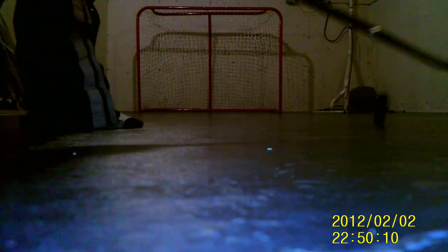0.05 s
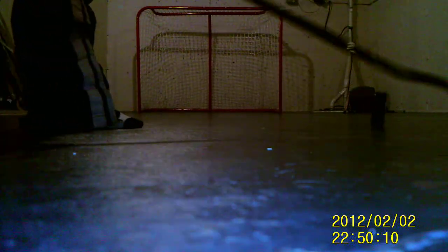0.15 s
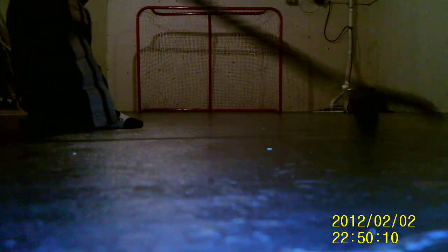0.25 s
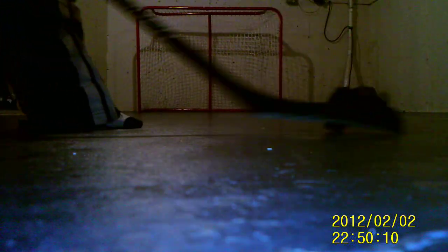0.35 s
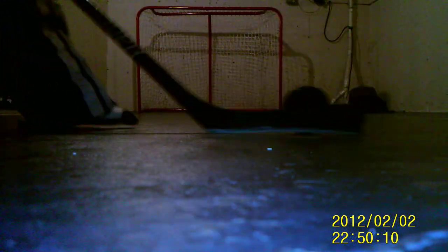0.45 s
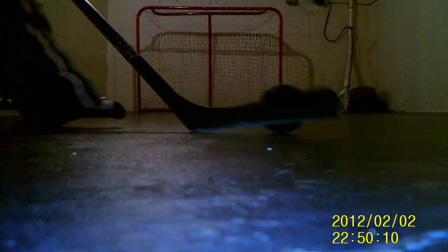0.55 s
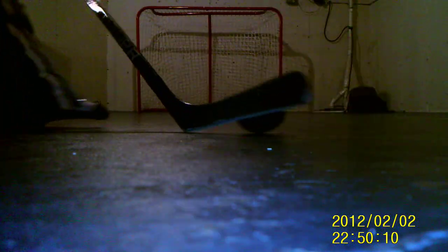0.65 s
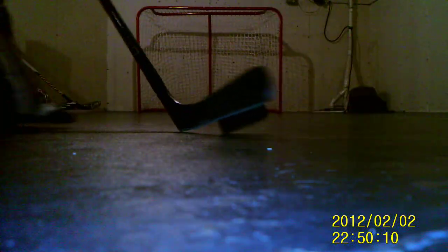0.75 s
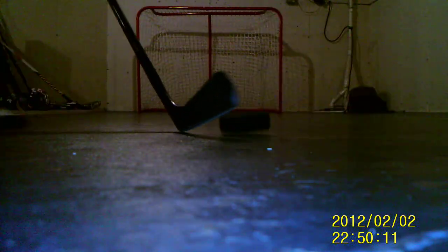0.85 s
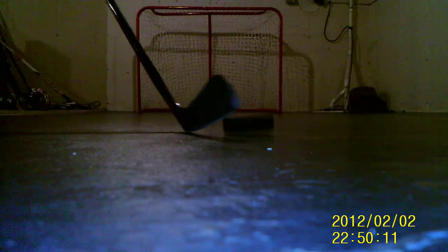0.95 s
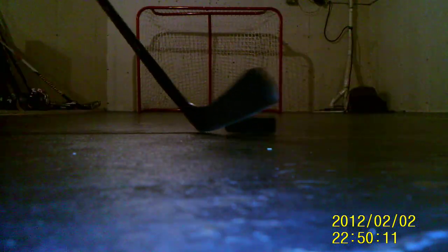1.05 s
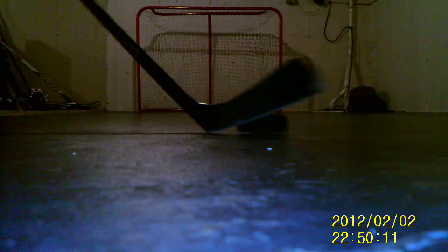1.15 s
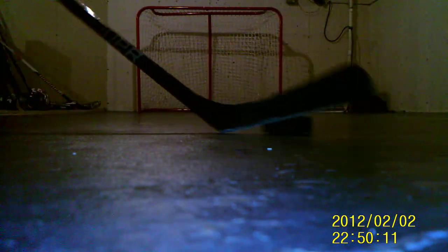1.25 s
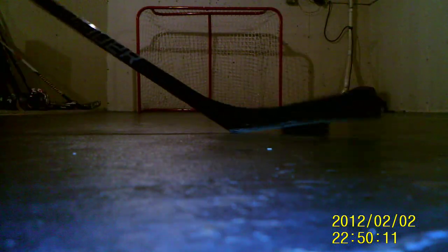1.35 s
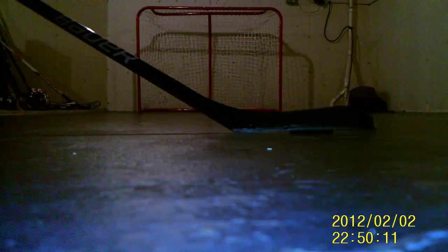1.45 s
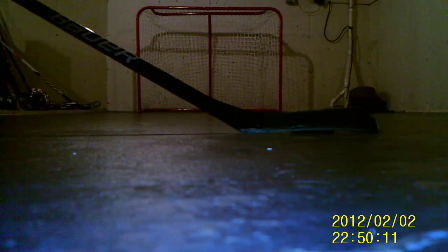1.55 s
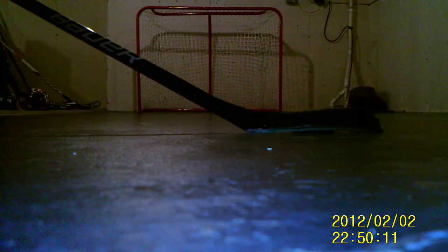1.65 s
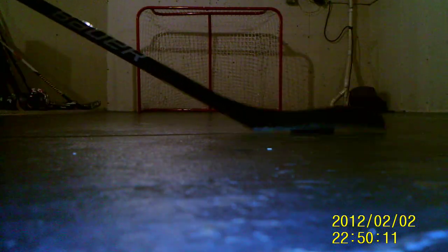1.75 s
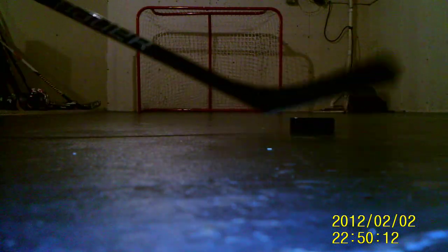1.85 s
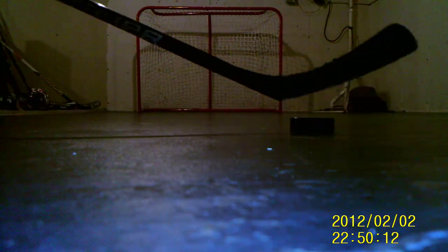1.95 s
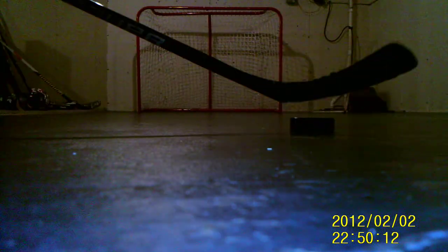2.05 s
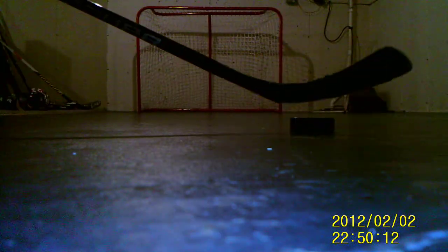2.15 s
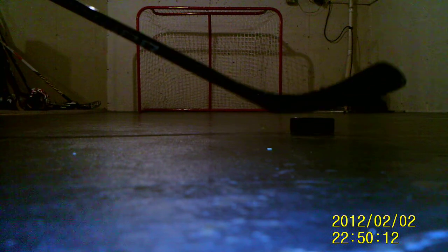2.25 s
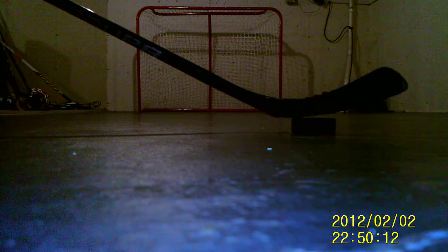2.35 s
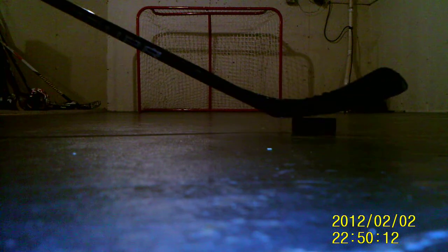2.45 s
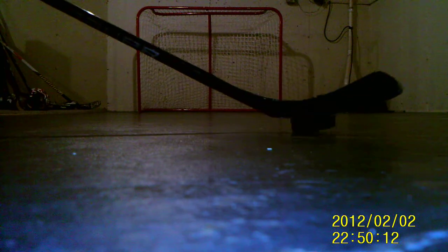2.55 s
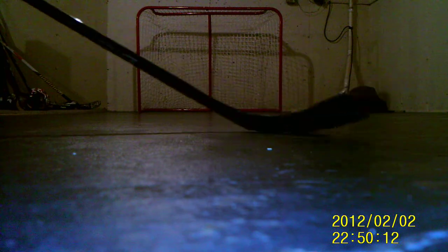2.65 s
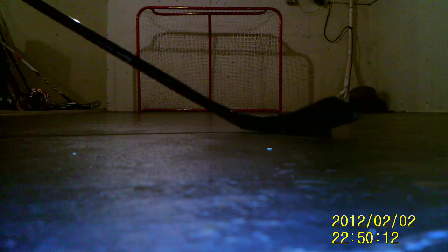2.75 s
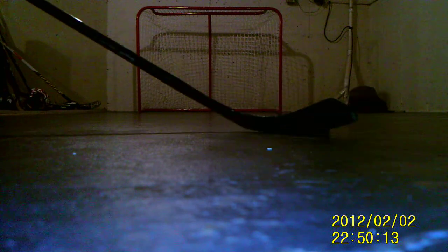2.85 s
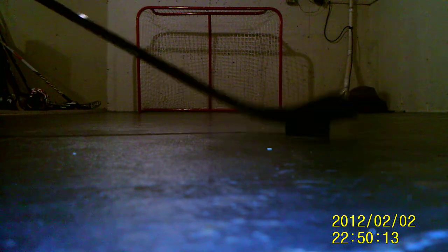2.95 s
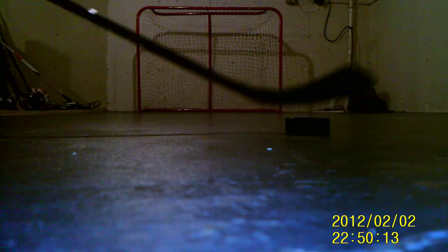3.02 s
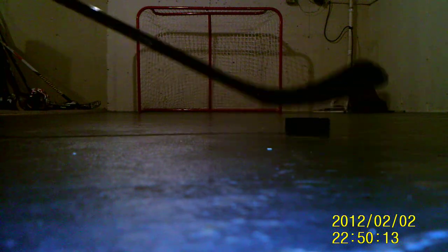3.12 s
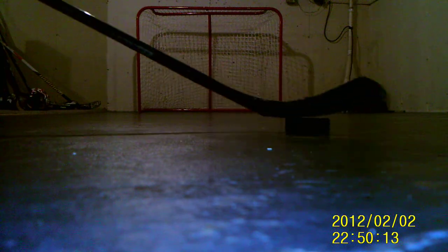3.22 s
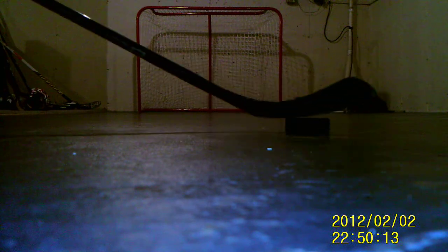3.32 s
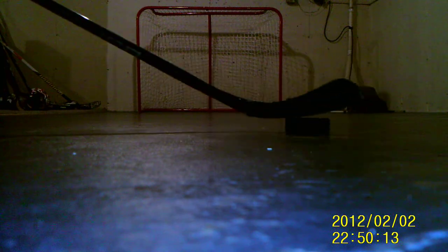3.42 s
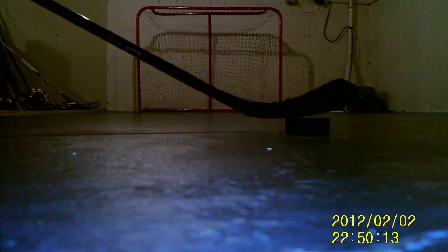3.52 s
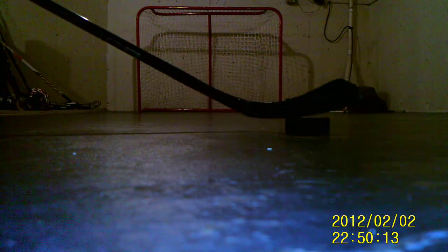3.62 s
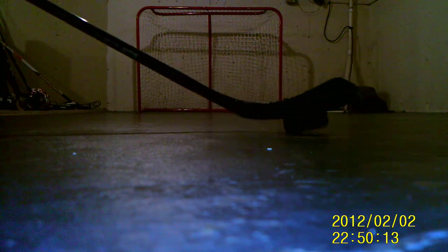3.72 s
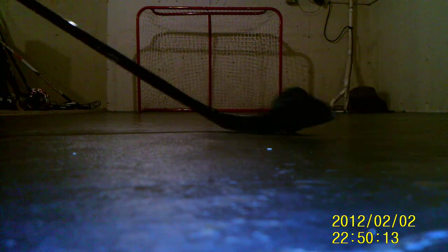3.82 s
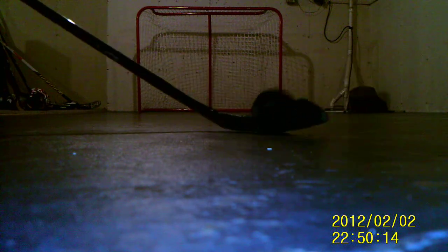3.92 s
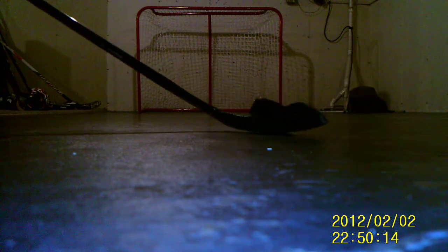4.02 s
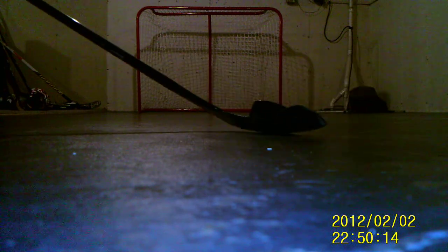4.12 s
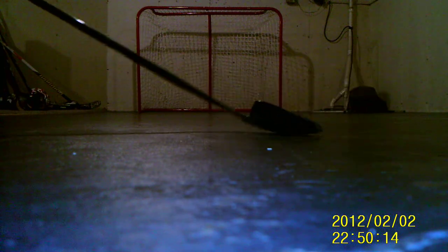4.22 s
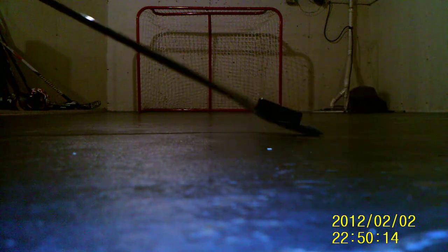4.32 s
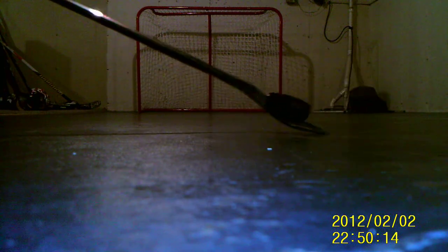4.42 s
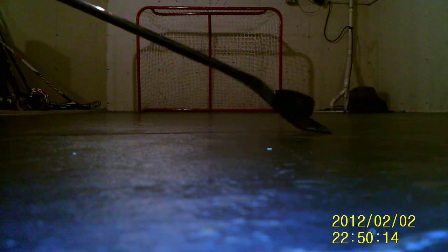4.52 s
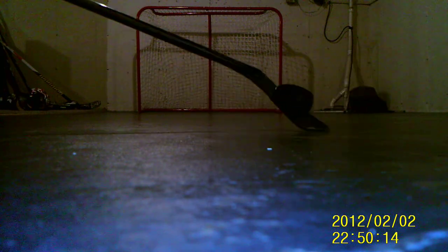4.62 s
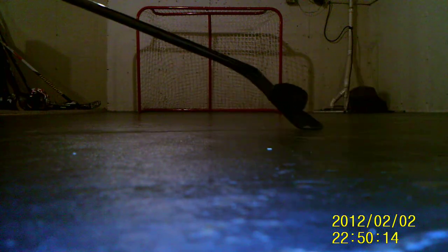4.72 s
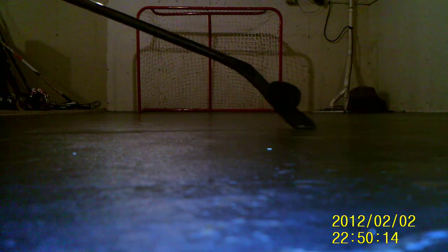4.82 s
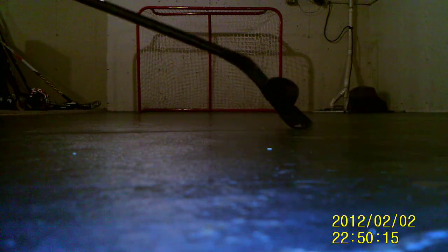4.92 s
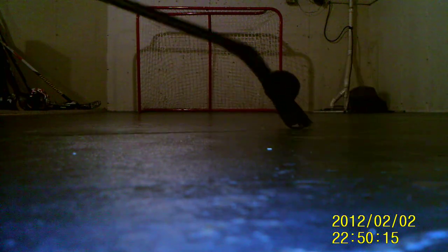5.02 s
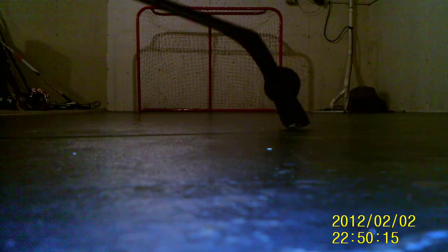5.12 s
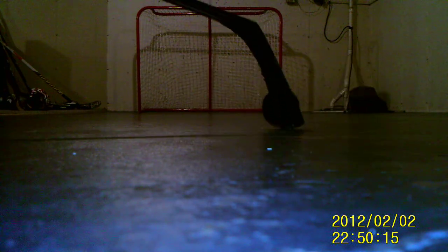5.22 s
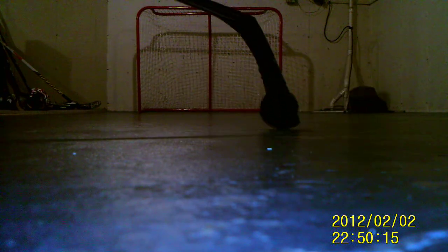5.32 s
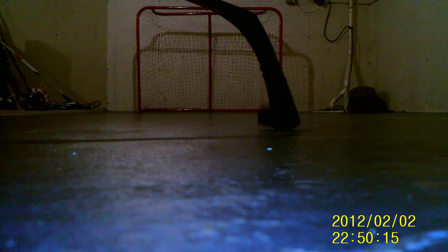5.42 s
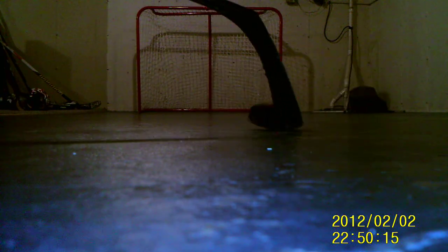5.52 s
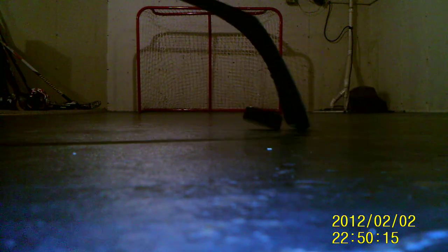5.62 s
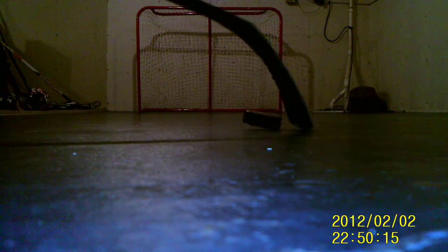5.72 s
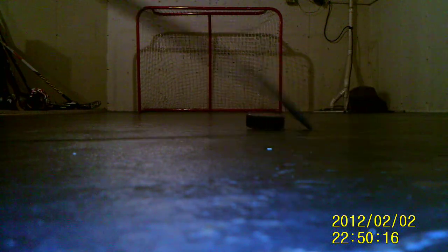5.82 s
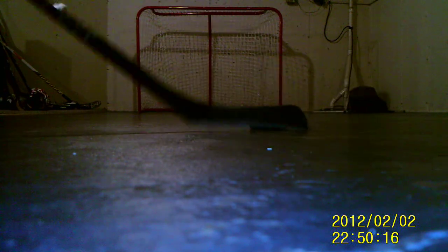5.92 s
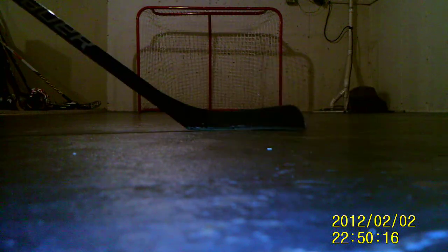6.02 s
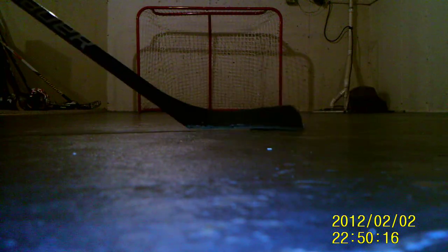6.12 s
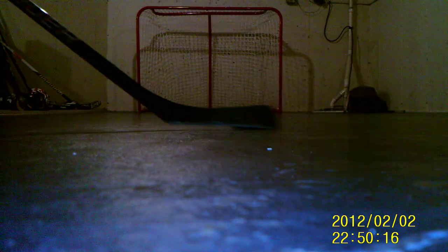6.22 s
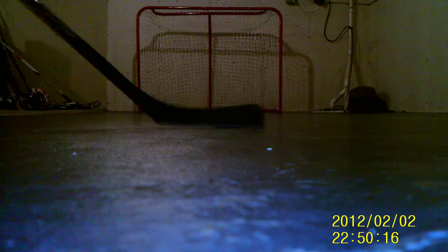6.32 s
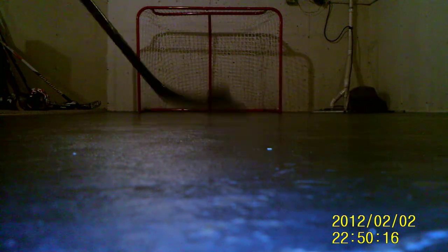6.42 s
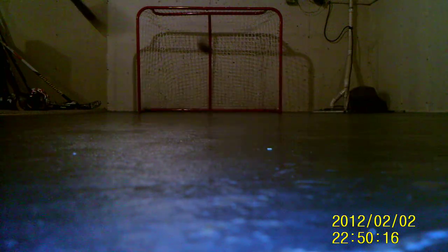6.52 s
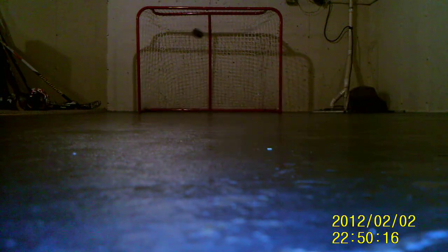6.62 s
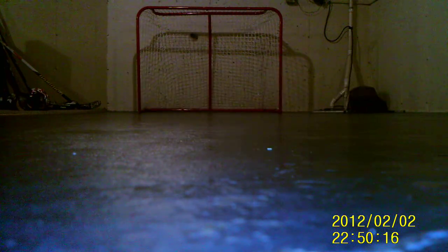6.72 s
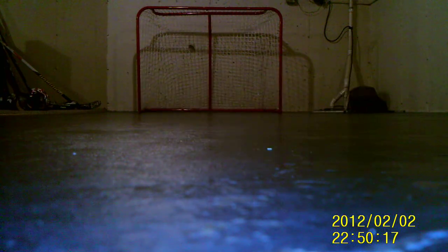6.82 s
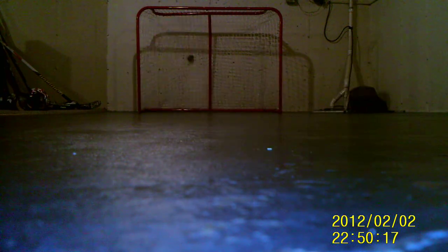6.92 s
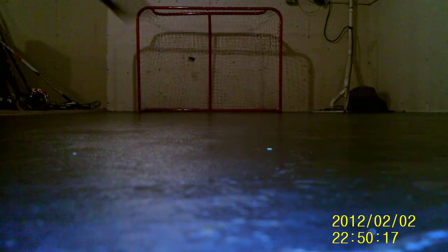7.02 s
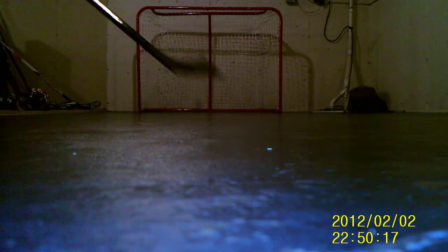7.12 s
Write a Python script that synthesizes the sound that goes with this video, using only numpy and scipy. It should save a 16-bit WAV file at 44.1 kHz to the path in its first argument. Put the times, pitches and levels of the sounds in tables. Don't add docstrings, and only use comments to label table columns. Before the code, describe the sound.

In a bare, reverberant basement, a hockey blade slaps concrete in a quick sharp cluster, then scrapes lightly. Isolated cracks follow, with small ticks and dull puck knocks between them. A rapid burst of clacks leads into an explosive shot, and half a second later the puck smashes into the far end with a bright ring. A cheap floor-level microphone adds hiss and faint buzz, clipping the loudest hits.

```python
import sys
import numpy as np
from scipy import signal
from scipy.fft import rfft, irfft
from scipy.io import wavfile
from scipy.ndimage import uniform_filter1d

SR = 44100
rng = np.random.default_rng(int(sys.argv[2]) if len(sys.argv) > 2 else 0)


def unload_audio(sound):
    columns = np.transpose(np.atleast_2d(sound))
    steps = np.round(np.clip(columns, -1, 1) * 32767)
    wavfile.write(sys.argv[1], SR, steps.astype(np.int16))


def how_loud(loudness_db):
    steps = np.asarray(loudness_db, float) / 20
    return 10 ** steps


N = 315756

# (frequency [Hz], gain [dB])
MIC = [(100, -3), (1000, 3), (1800, 6.5), (2600, 6), (3300, 7.5), (4300, 4.5), (5000, -4), (5600, -13.5),
       (6200, -46.5), (7000, -111)]


def rms1(x):
    return x / np.sqrt(np.mean(x ** 2))


def band(x, hz, width):
    return signal.lfilter(*signal.iirpeak(hz, hz / width, SR), x)


def band_twice(x, hz, width):
    return band(band(x, hz, width), hz, width)


def slow_noise(size, n=N):
    return rms1(uniform_filter1d(rng.standard_normal(n), size=size))


def colour(x, points):
    size = 4096
    hz, db = np.transpose(points)
    bin_hz = np.arange(size // 2 + 1) * SR / size
    log_gain = np.interp(np.log(bin_hz + 1), np.log(hz), db) * np.log(10) / 20
    cepstrum = irfft(log_gain)
    cepstrum[1:size // 2] *= 2
    cepstrum[size // 2 + 1:] = 0
    impulse = irfft(np.exp(rfft(cepstrum)))
    return signal.fftconvolve(x, impulse)[:len(x)]


def add(out, s, x):
    i = int(s * SR)
    out[i:i + len(x)] += x[:len(out) - i]


def ring(modes, chance, scatter_db):
    hz, db, t60 = np.transpose(modes)[:, :, None]
    pitch_chance, level_chance = chance[:, :len(hz), None]
    sign = np.sign(chance[0, ::-1][:len(hz), None])
    t = np.arange(int(.3 * SR)) / SR
    waves = np.sin(2 * np.pi * hz * (1 + 0.064 * pitch_chance) * t)
    waves = waves * np.exp(-np.log(1000) * t / t60)
    waves = waves * sign * np.clip(t / 0.0015, 0, 1)
    y = np.sum(how_loud(db + scatter_db * level_chance) * waves, axis=0)
    return y / np.max(np.abs(y))


def camera_noise():
    # (frequency [Hz], density [dB per Hz])
    hiss_spectrum = [(8.8, -13.5), (15, 3), (47, -4.5), (157, -10), (211, -14.5), (298, -18), (642, -22),
                     (1220, -23.5), (2050, -26.5), (3450, -26), (4200, -28), (4750, -25.5), (5510, -36.5),
                     (7160, -70.5), (12100, -120)]
    frame_hz, buzz_db, hiss_db, offset = 29.925, -62, -62, .0004
    frame = np.arange(N) / SR * frame_hz
    depth = how_loud(1.4 * rng.standard_normal(int(frame[-1]) + 1))[frame.astype(int)]
    saw = depth * (1 - 2 * (frame % 1) + 0.24 * np.sin(2 * np.pi * frame))
    buzz = signal.lfilter(*signal.butter(2, 600, fs=SR), saw)
    hiss = colour(rng.standard_normal(N), hiss_spectrum)
    return how_loud(buzz_db) * rms1(buzz) + how_loud(hiss_db) * rms1(hiss) + offset


def basement():
    # (centre [Hz], t60 [s], level [dB])
    walls = [(125, 0.41, -2.5), (250, 0.33, -6), (560, 0.63, -1.5), (1120, 0.57, -1), (2024, 0.54, -11),
             (4470, 0.38, 1)]
    early_db, early_t60 = -8, 0.01
    t = np.arange(int(.6 * SR)) / SR
    echoes = rng.standard_normal(3 * SR) * how_loud(3.05 * slow_noise(60, 3 * SR))
    bands = np.array([band(echoes, hz, 0.98 * hz) for hz, t60, db in walls])
    fades = np.array([how_loud(db - 60 * t / t60) for hz, t60, db in walls])
    early = 1 + how_loud(early_db - 60 * t / early_t60)
    onset = np.clip((t - .002) / 0.001, 0, 1)
    fades = fades * early * onset

    def room():
        i = rng.integers(2 * SR)
        tail = np.sum(fades * bands[:, i:i + len(t)], axis=0)
        return tail / np.sqrt(np.sum(tail ** 2))
    return room


def contacts():
    # (time [s], crack peak [dB], crack centre [Hz], knock level [dB], knock centre [Hz])
    slaps = [(.2781, -29, 3200, -41, 395), (0.3215, -11.5, 3700, -35.5, 1230),
             (0.3349, -15, 3720, -40, 700), (0.4845, -18.5, 3020, -40.5, 583),
             (0.5135, -28, 3480, -45, 425), (2.6344, -32, 3370, -49.5, 553),
             (2.6707, -9, 3090, -40.5, 1080), (2.7554, -29, 2930, -47, 890), (2.7696, -30, 2950, -61, 1480),
             (2.9289, -27.5, 3730, -57.5, 1300), (3.8433, -13.5, 2900, -34.5, 400),
             (4.0133, -26.5, 2250, -43.5, 678), (4.0214, -28.5, 2800, -44.5, 660),
             (6.0113, -21.5, 3040, -46.5, 610), (6.322, -30, 3520, -54, 597),
             (6.3925, -20, 2600, -36.5, 498), (6.3954, -12, 3000, -40, 1212),
             (6.4078, -12, 3300, -49.5, 571), (6.4116, -8.5, 3540, -37.5, 1310),
             (6.4338, -10, 2290, -37, 610), (6.4447, -11, 3600, -34, 528.6)]
    # (time [s], crack peak [dB], crack centre [Hz], knock level [dB], knock centre [Hz])
    shot = [
        (6.4310, -2.2, 2600, -36, 1200),
    ]
    # (time [s], crack peak [dB], crack centre [Hz], knock level [dB], knock centre [Hz])
    wall_hits = [
        (6.9752, -1.45, 2600, -29, 1000),
        (6.9716, -10, 2500, -30, 950),
        (6.98, -11, 2500, -42, 280),
        (7.0925, -24, 2600, -44, 1000),
    ]
    # (time [s], knock level [dB], knock centre [Hz], crack above knock [dB])
    knocks = [(1.0194, -59, 565, 7), (1.0939, -54, 358, 10), (1.3151, -52, 456, 12), (3.998, -38, 480, 5.5),
              (4.0997, -54, 600, 13), (4.923, -56, 800, 15), (5.27, -43, 380, 6.5),
              (5.3028, -46.5, 318, 12.5), (5.3807, -45.5, 398, 2), (5.4975, -51, 336, 8),
              (5.6265, -47.5, 430, 3.5), (5.7378, -55, 380, 10), (5.8289, -56, 414, 14),
              (5.905, -57.5, 522, 13)]
    # (time [s], crack peak [dB], crack centre [Hz], knock centre [Hz])
    ticks = [(1.3749, -40.5, 3380, 656), (1.848, -44, 3570, 335), (1.9838, -47.5, 3170, 266),
             (2.3514, -41.5, 2270, 1410), (2.6463, -34, 3293, 802), (3.2135, -42.5, 4000, 204.4),
             (3.3817, -49.5, 3970, 202), (3.4109, -39.5, 4100, 196), (3.8285, -31.5, 3640, 1200),
             (4.448, -49, 3220, 285), (4.5436, -41.5, 3080, 581), (4.8803, -42, 3440, 500),
             (6.0445, -34.5, 3200, 1320), (6.2493, -42, 3038, 546), (6.2846, -35, 3230, 1155),
             (6.9425, -47.5, 3400, 900), (6.4268, -25, 3000, 534)]
    puck_crack_hz, tick_knock_db = 3200, -20
    slap_room_db, wall_room_db, knock_room_db, tick_room_db = -3.5, 0.2, -2.5, -2
    rows = [(*row, slap_room_db) for row in slaps + shot]
    rows += [(*row, wall_room_db) for row in wall_hits]
    rows += [(s, db + over_db, puck_crack_hz, db, hz, knock_room_db) for s, db, hz, over_db in knocks]
    rows += [(s, db, hz, db + tick_knock_db, knock_hz, tick_room_db) for s, db, hz, knock_hz in ticks]
    return rows


def blows(room):
    # (frequency [Hz], t60 [s])
    body = [(205, 0.052), (255, 0.033), (315, 0.025), (400, 0.038), (520, 0.056), (640, 0.03), (820, 0.017),
            (1000, 0.02), (1250, 0.056), (1570, 0.034), (2000, 0.0063)]
    delay_s, room_level_db = .0006, -4
    thump_db = -4
    out = np.zeros(N)
    t = np.arange(int(.03 * SR)) / SR
    click = 1. * (t == 0)
    for s, crack_db, hz, knock_db, knock_hz, room_db in contacts():
        chance, splinter = rng.standard_normal((2, len(body))), rng.standard_normal(len(t))
        push = click + 0.12 * splinter * np.exp(-t / 0.0039)
        crack = band_twice(push, hz, 0.78 * hz) + 0.056 * how_loud(1.7 * crack_db) * push
        crack = how_loud(crack_db) * crack / np.max(np.abs(colour(crack, MIC)))
        struck = [(f, -6 * np.log2(f / knock_hz) ** 2, t60) for f, t60 in body]
        air = how_loud(knock_db + 5) * ring(struck, chance, 2)
        thump = band(band(push, knock_hz, 0.75 * knock_hz), knock_hz, 2.3 * knock_hz)
        air[:len(t)] += how_loud(knock_db + 5 + thump_db) * thump / np.max(np.abs(thump))
        add(out, s + delay_s, air)
        add(out, s + delay_s, crack)
        even = band_twice(click, hz, 0.9 * hz) + 0.022 * click
        air[:len(t)] += even * np.sqrt(np.sum(crack ** 2) / np.sum(even ** 2))
        add(out, s + delay_s, how_loud(room_db + room_level_db) * signal.fftconvolve(air, room()))
    return out


def slab_thuds():
    # (frequency [Hz], level [dB], t60 [s])
    slab = [(62, -25.5, 0.13), (100.1, 1.5, 0.31), (158.5, -6, 0.36), (234.5, -5.5, 0.13)]
    # (time [s], peak level [dB])
    thuds = [(0.283, -45.5), (0.483, -47), (0.515, -45.5), (1.316, -50.5), (2.353, -57), (2.669, -33.5),
             (2.754, -42), (3.213, -46.5), (3.845, -34.5), (3.999, -46.5), (5.269, -33.5), (5.303, -39.5),
             (5.38, -39.5), (5.497, -47.5), (5.626, -47), (5.824, -51), (6.394, -51), (6.975, -48)]
    out = np.zeros(N)
    for s, db in thuds:
        add(out, s, how_loud(db) * ring(slab, rng.standard_normal((2, len(slab))), 0.68))
    return out


def slides():
    # (start [s], rise [s], fall per 20 dB [s], grit hiss level [dB], blade drone level [dB])
    strokes = [(0.306, 0.064, 0.045, -26, -50), (0.376, 0.024, 0.1937, -39.5, -45),
               (.66, 0.1, 1.58, -57.5, -71.5), (1.01, 0.34, 0.43, -71, -68), (2.7, 0.13, 0.05, -53.5, -53),
               (3.802, 0.015, 0.44, -52.5, -67), (3.995, 0.019, 0.58, -72, -64.5),
               (4.49, 0.062, 0.2, -57.5, -64), (4.58, 0.24, 0.12, -68, -55.5),
               (4.86, 0.036, 0.48, -58, -62), (5.26, .02, 1, -75, -66.5), (5.55, 0.12, 2.27, -69, -66),
               (6.21, 0.038, .5, -51, -52.5), (6.28, 0.049, 0.2057, -37, -47.5),
               (6.35, 0.053, 0.11, -41.5, -42)]
    # (centre [Hz], width [Hz], level [dB])
    grit = [(2600, 200, -9.5), (3200, 720, -0.5), (4160, 510, -3.5)]
    # (centre [Hz], width [Hz], level [dB])
    blade = [(300, 150, -5), (450, 120, -3), (600, 50, 2), (820, 60, 1), (1150, 70, -1), (900, 900, -9)]
    t, hiss, drone = np.arange(N) / SR, 0, 0
    for s, rise, fall, hiss_db, drone_db in strokes:
        build = np.clip((t - s) / rise, 0, 1) ** 0.92
        press = build * how_loud(-20 * np.clip(t - s - rise, 0, None) / fall)
        hiss = hiss + press * how_loud(hiss_db - 7)
        drone = drone + press * how_loud(drone_db - 5.5)
    grains = (rng.random(N) < .12) * rng.standard_normal(N) * how_loud(1.0 * rng.exponential(size=N))
    scrape = sum(how_loud(db) * band(grains, hz, width) for hz, width, db in grit)
    high = rms1(scrape * how_loud(0.48 * slow_noise(500)))
    hum = sum(how_loud(db) * band(rng.standard_normal(N), hz, width) for hz, width, db in blade)
    low = rms1(hum * how_loud(2.7 * slow_noise(700)))
    return hiss * high + drone * low


def pings():
    # (time [s], frequency [Hz], level [dB], t60 [s])
    rings = [
        (3.844, 250, -36, 0.22),
        (4.02, 728, -46, 0.38),
        (5.498, 2970, -65.5, 0.34),
        (5.625, 3020, -60.5, 0.19),
        (6.431, 1578, -38.5, 0.53),
        (6.976, 1220, -42, 0.433),
        (6.977, 2555, -33, 0.54),
        (.322, 1280, -48.5, 0.52),
    ]
    out = np.zeros(N)
    for s, hz, db, t60 in rings:
        t = np.arange(int(t60 * SR)) / SR
        tone = rms1(band_twice(rng.standard_normal(len(t)), hz, 0.037 * hz + 30))
        add(out, s, how_loud(db - 60 * t / t60) * tone)
    return out


def squeak():
    # (time [s], length [s], from [Hz], to [Hz], level [dB])
    glides = [
        (.72, .1, 2000, 2950, -68),
        (.83, .17, 3000, 3230, -67),
        (4.72, .13, 800, 810, -64),
        (4.89, .14, 780, 870, -66),
        (5.05, .1, 790, 870, -72),
    ]
    out = np.zeros(N)
    rough = 1 + .7 * slow_noise(400)
    for s, length, from_hz, to_hz, db in glides:
        u = np.arange(int(length * SR)) / (length * SR)
        phase = 2 * np.pi * np.cumsum(from_hz + (to_hz - from_hz) * u) / SR
        add(out, s, how_loud(db) * np.sin(np.pi * u) * np.sin(phase))
    return out * rough


def roll():
    start_s, length_s, hz, width_hz, db = 0.744, 0.46, 295, 260, -66.5
    u = np.clip((np.arange(N) / SR - start_s) / length_s, 0, 1)
    bumps = how_loud(1.4 * slow_noise(900))
    rumble = rms1(band(band(rng.standard_normal(N), hz, width_hz), hz, 2 * width_hz))
    return how_loud(db) * np.sin(np.pi * u) * bumps * rumble


def scene():
    room = basement()
    struck = blows(room) + slab_thuds() + pings()
    rub = slides() + squeak() + roll()
    rub_echo = how_loud(-8) * signal.fftconvolve(rub, room())[:N]
    return (struck + rub + rub_echo)[None]


def top_cut(x):
    return signal.sosfilt(signal.butter(12, 16000, fs=SR, output="sos"), x)


def record(dry):
    ceiling = .7
    x = colour(dry[0], MIC) + camera_noise()
    return top_cut(np.clip(x, -ceiling, ceiling)[None])


dry = scene()
out = record(dry)
unload_audio(out)
```